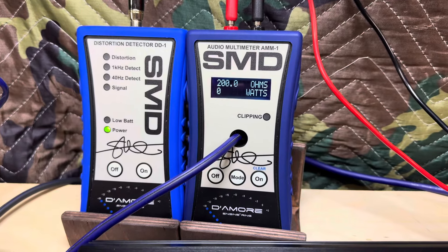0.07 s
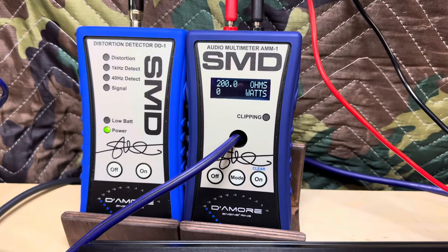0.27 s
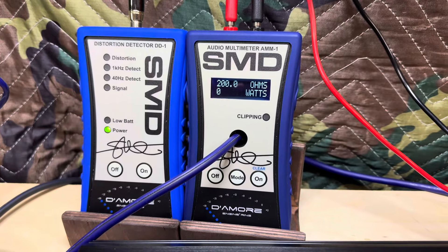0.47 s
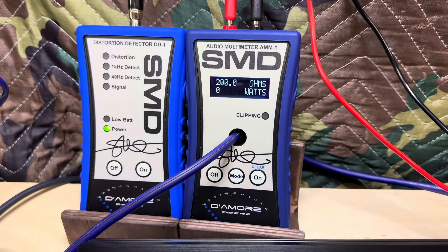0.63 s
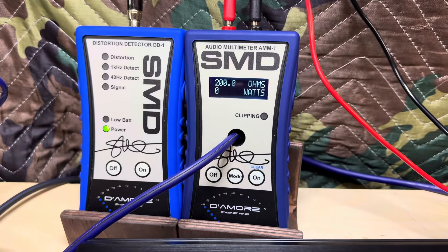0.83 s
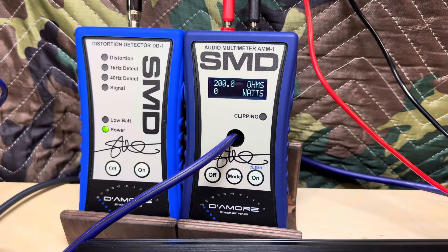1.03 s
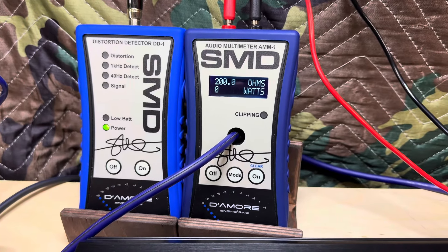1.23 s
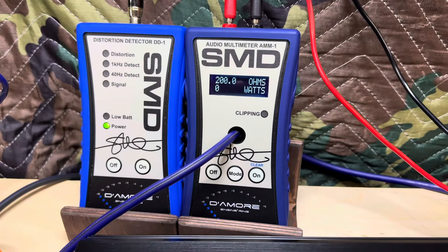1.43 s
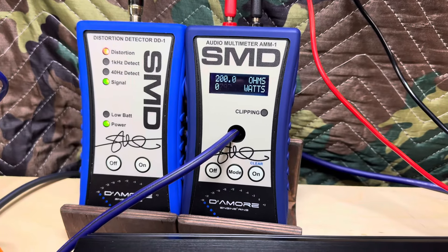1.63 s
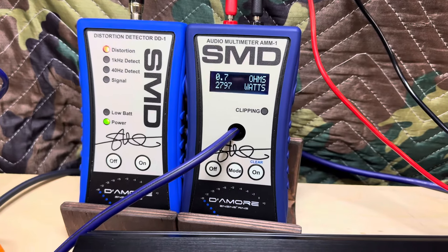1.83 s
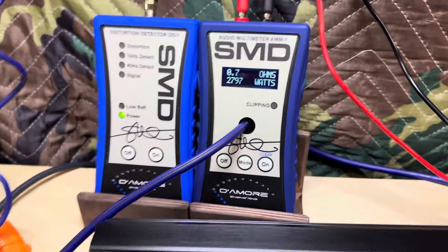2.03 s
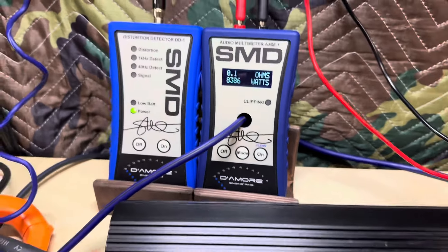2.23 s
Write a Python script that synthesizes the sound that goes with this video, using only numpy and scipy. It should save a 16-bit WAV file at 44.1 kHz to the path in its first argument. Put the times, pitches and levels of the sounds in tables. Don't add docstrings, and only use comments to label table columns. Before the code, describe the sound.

Electronic amplifier blows with a loud arcing pop, thump, sizzle and a quick string of snaps

```python
import sys
import numpy as np
from scipy import signal
from scipy.fft import rfft, irfft, next_fast_len
from scipy.io import wavfile
from scipy.ndimage import map_coordinates

SR = 44100
rng = np.random.default_rng(int(sys.argv[2]) if len(sys.argv) > 2 else 0)


def how_loud(loudness_db):
    steps = np.asarray(loudness_db, float) / 20
    return 10 ** steps


def master_out(mix):
    frames = np.transpose(np.atleast_2d(mix))
    ceiling = np.clip(frames, -1, 1)
    pcm = np.round(ceiling * 32767).astype(np.int16)
    wavfile.write(sys.argv[1], SR, pcm)


N = 101341


def unit(x):
    return x / np.sqrt(np.mean(x ** 2) + 1e-20)


def along(points, hz):
    f, v = np.transpose(points)
    return np.interp(np.log(hz + 1), np.log(f + 1), v)


def curves(rows):
    s, *cols = np.transpose(rows)
    return [np.interp(np.arange(N) / SR, s, c, left=-140) for c in cols]


def wobble(rate):
    knots = rng.standard_normal(int(N * rate / SR) + 4)
    return map_coordinates(knots, [np.arange(N) * rate / SR])


def filtered(x, response):
    m = next_fast_len(x.shape[-1] + 8192)
    spectrum = rfft(x, m) * response(np.fft.rfftfreq(m, 1 / SR))
    return irfft(spectrum, m)[..., :x.shape[-1]]


def ringing(peaks):
    def response(f):
        total = 0
        for k, (c, w, db) in enumerate(peaks):
            total = total + (-1) ** k * how_loud(db) * 1j * f * w / (c * c - f * f + 1j * f * w)
        return total
    return response


# frequency in Hz, likeness from -1 to 1.
ALIKE = [(60, 1), (240, 0.85), (950, 0.16), (3770, -0.16), (15000, 0.33)]


def spread(pair, response, alike=ALIKE):
    def mid_side(hz):
        turn = np.arccos(np.clip(along(alike, hz), -1, 1)) / 2
        return response(hz) * [np.cos(turn), np.sin(turn)]
    mid, side = filtered(pair, mid_side)
    return unit(np.array([mid + side, mid - side]))


def rush(spectrum, lumpy_db, rate):
    noise = rng.standard_normal((2, N)) * how_loud(lumpy_db * wobble(rate))
    return spread(noise, lambda hz: how_loud(along(spectrum, hz)))


def add(track, s, x):
    part = track[..., round(s * SR):][..., :x.shape[-1]]
    part += x[..., :part.shape[-1]]


# time in seconds, rumble in dB, cloth rustle in dB.
AIR = [(0.0, -69, -67), (0.142, -65.5, -78), (0.358, -65.5, -71), (0.402, -61.5, -77.5),
       (0.558, -61.5, -67.5), (0.59, -55, -75), (0.606, -64, -63.5), (0.666, -52, -61.5),
       (0.842, -67.5, -87.5), (0.86, -62, -72.5), (0.97, -64.5, -78.5), (1.032, -66.5, -76.5),
       (1.07, -63, -75), (1.126, -65.5, -78.5), (1.21, -67, -78), (1.4, -61.5, -73.5), (1.624, -60, -74.5),
       (1.7, -51, -81)]
# frequency in Hz, density in dB per Hz.
RUMBLE = [(12, -47), (20, -31), (61, -0.5), (156, -13), (287, -23), (448, -24.5), (586, -28), (700, -37),
          (910, -31), (1540, -120)]
RUSTLE = [(180, 1), (300, -6.5), (366, -13), (523, -9), (735, -8.5), (2680, -18), (9000, -37.5),
          (13000, -41), (19800, -120)]
HISS = [(1200, -3), (2000, 0), (4200, -2.5), (7500, -4.5), (11000, -8.5), (15500, -5.5), (16700, -14),
        (17500, -60)]


def room():
    rumble_db, rustle_db = [np.where(c < -130, c.max(), c) for c in curves(AIR)]
    rumble = how_loud(rumble_db) * rush(RUMBLE, 3.94, 14.6)
    rustle = how_loud(rustle_db) * rush(RUSTLE, 1.2, 60.4)
    return rumble + rustle + how_loud(-85.5) * rush(HISS, 0.81, 7.5)


# start in seconds, level in dB.
CHIRPS = [
    (0.341, -67),
    (1.146, -63.5),
]


def bird():
    low_hz, high_hz, length_s, echo_t60 = 4600, 8100, .015, 0.16
    out, t = np.zeros((2, N)), np.arange(round(length_s * SR)) / SR
    u, late = t / length_s, np.arange(SR // 8) / SR
    hz = low_hz + (high_hz - low_hz) * u ** 0.91
    call = np.sin(np.pi * u) * np.sin(2 * np.pi * np.cumsum(hz) / SR)
    for s, db in CHIRPS:
        echo = 0.084 * rng.standard_normal((2, len(late))) * how_loud(-60 * late / echo_t60)
        echo[:, 0] = 0.45
        add(out, s, how_loud(db) * signal.fftconvolve(call[None], echo, axes=1))
    return out


TICK_S = [.003, .012, .03, .083, .545, .864]
# level in dB, ring in Hz, width in Hz, t60 in seconds.
TICKS = [
    (-59.5, 4700, 2100, 0.027),
    (-67, 11000, 3300, .012),
    (-70.5, 4300, 14000, 0.0078),
    (-55.5, 5300, 840, 0.012),
    (-57, 1220, 120, 0.016),
    (-67.5, 1160, 91, 0.0051),
]
# frequency in Hz, width in Hz, level in dB.
TICK_BODY = [(1940, 460, -9), (4700, 1500, -25)]


def ticks():
    crack_db = -36.5
    out, t = np.zeros((2, N)), np.arange(SR // 10) / SR
    shell = ringing(TICK_BODY)
    for s, (db, hz, width, t60) in zip(TICK_S, TICKS):
        pair = rng.standard_normal((2, len(t))) * how_loud(-60 * t / t60)
        ring = ringing([(hz, width, 0)])

        def response(f):
            return ring(f) + np.sqrt(width / 1500) * shell(f) + how_loud(crack_db) * (f > 400)
        add(out, s, how_loud(db - 9) * spread(pair, response))
    return out


# start in seconds, peak in dB, first Hz, last Hz, length in
# seconds.
THUMPS = [
    (1.719, -21.5, 288, 46.3, 0.028),
    (1.837, -9.5, 370, 36, 0.027),
    (1.915, -28.5, 200, 135, 0.035),
    (2.04, -28.5, 142, 59.5, 0.054),
    (2.176, -22.5, 218, 131.8, 0.036),
    (2.245, -22.5, 240, 124, 0.013),
    (2.092, -23.5, 155, 81.5, 0.017),
]


def thumps():
    fall_s, rise_s = .009, .0012
    out, t = np.zeros(N), np.arange(SR // 8) / SR
    for s, db, first_hz, last_hz, length in THUMPS:
        hz = last_hz + (first_hz - last_hz) * np.exp(-t / fall_s)
        shape = (1 - np.exp(-t / rise_s)) * np.exp(-(t / (0.92 * length)) ** 3)
        add(out, s, how_loud(db) * shape * np.sin(2 * np.pi * np.cumsum(hz) / SR))
    return out


def swells(rows, skew):
    out = np.zeros(N)
    for start, end, hz, db in rows:
        t = np.arange(round((end - start) * SR)) / SR
        shape = np.sin(np.pi * (t / t[-1]) ** skew)
        add(out, start, how_loud(db) * shape * np.sin(2 * np.pi * hz * t))
    return out


# start in seconds, end in seconds, pitch in Hz, peak in dB.
RINGS = [(1.71, 1.743, 1812, -24.5), (1.718, 1.728, 958, -14), (1.713, 1.72, 1236, -15),
         (1.718, 1.731, 334, -12.5), (1.792, 1.817, 392.5, -24.5), (1.828, 1.855, 1800, -34),
         (1.901, 1.946, 389.6, -35.5), (1.96, 1.995, 380.5, -39.5), (2.044, 2.083, 364, -32),
         (2.076, 2.11, 380.7, -18), (2.11, 2.118, 1291, -17), (2.113, 2.127, 397, -22.5),
         (2.139, 2.155, 415, -25), (2.17, 2.192, 413, -16), (2.191, 2.221, 382, -15),
         (2.18, 2.208, 1530, -24), (2.243, 2.252, 3660, -22), (2.241, 2.256, 10800, -24.5),
         (2.242, 2.258, 425.5, -15), (2.265, 2.29, 1150, -39), (2.291, 2.316, 365, -25.5)]


def rings():
    return swells(RINGS, 0.93)


# start in seconds, end in seconds, pitch in Hz, peak in dB.
WHINE = [
    (1.64, 1.71, 174, -45),
    (1.635, 1.68, 240, -53),
    (1.701, 1.716, 1814, -22.5),
]


def whine():
    return swells(WHINE, 2.7)


# time in seconds, flame in dB, jet in dB.
SIZZLE = [(1.628, -78, -73), (1.636, -89, -58.5), (1.7, -71.5, -55), (1.73, -53, -89), (1.765, -58, -59),
          (1.87, -60, -56), (1.96, -55.5, -48.5), (2.01, -50.5, -42), (2.055, -49.5, -42.5),
          (2.098, -50, -45.5), (2.104, -60, -73), (2.13, -46, -47), (2.166, -54.5, -49), (2.2, -50, -43),
          (2.235, -46, -41), (2.265, -46.5, -52), (2.298, -52, -37)]
# frequency in Hz, density in dB per Hz.
FLAME = [(350, -34), (600, -11.5), (1230, -5), (1740, -5.5), (3550, -14), (4310, -17.5), (7680, -14.5),
         (9000, -39), (11700, -68), (19800, -120)]
JET = [(5290, -53), (9000, 8.5), (10200, -1), (13600, 5), (15400, 4), (16300, -25), (16600, -69)]
# time in seconds, shake in dB.
SHAKE = [(1.63, -86), (1.698, -56.5), (1.735, -29), (1.765, -37.5), (1.788, -38.5), (1.8, -40.5),
         (1.826, -26.5), (1.876, -35.5), (1.92, -32), (2.0, -36.5), (2.06, -29), (2.092, -27),
         (2.13, -28.5), (2.158, -30.5), (2.195, -21), (2.212, -27.5), (2.275, -38), (2.298, -27)]
# frequency in Hz, width in Hz, level in dB.
PANEL = [(374.6, 29.4, 0.5), (474, 32.6, -0.5), (302, 245, -9), (127, 104.5, -2), (589, 92, -7),
         (1100, 417, -11.5)]
# frequency in Hz, left-right likeness.
SNAP_ALIKE = [(100, 1), (500, 0.87), (1500, 0.65), (4000, 0.067), (10000, 0.82)]


def arc():
    flame_db, jet_db = curves(SIZZLE)
    shake_db, = curves(SHAKE)
    shaking = rng.standard_normal((2, N)) * how_loud(2.1 * wobble(150))
    tremble = spread(shaking, ringing(PANEL), SNAP_ALIKE)
    flame = how_loud(flame_db + 10.0) * rush(FLAME, 2.75, 120)
    return flame + how_loud(jet_db) * rush(JET, 1.7, 53) + how_loud(shake_db) * tremble


# start in seconds, burst length in seconds, spark in dB, case knock in dB,
# brightness in dB per octave.
SNAPS = [(1.6362, 0.021, -63, -73, -8.5), (1.7134, 0.013, -21, -10, -4), (1.718, 0.0035, -15.5, -10, -3.5),
         (1.7905, 0.0068, -58, -37.5, 1), (1.8367, 0.0071, -44, -23, -15.5), (1.919, 0.009, -56, -29.5, -1),
         (1.9674, 0.028, -46, -40, -8.5), (2.1114, 0.012, -25.5, -15.5, -4.5),
         (2.175, 0.0089, -23, -18, -10.5), (2.1841, 0.0152, -46, -21.5, -13),
         (2.226, 0.0064, -36.5, -29.5, -9.5), (2.2426, 0.012, -23, -19, -6.5),
         (1.7998, 0.0051, -54, -28, -4)]
# frequency in Hz, density in dB per Hz.
SPARK = [(900, -84), (2100, -5), (3650, -0.5), (5100, -5.5), (7300, 2), (11000, 6.5), (15300, 16.5),
         (16900, -27)]
# frequency in Hz, width in Hz, level in dB.
CASE = [(358, 70, 10), (470, 220, -9), (607, 270, -2), (926, 156, 4.5), (1095, 150, 5), (1420, 144, 3.5),
        (1810, 27, 6), (2830, 2000, -20)]
POP_PARTS = [(334, 101, 1.5), (554, 214, -0.5), (910, 148, -1), (1270, 287, -5), (1800, 115, -6.5),
             (2400, 56, -16), (3240, 270, -33), (6100, 64, -45), (7700, 94, -40), (10800, 650, -18.5),
             (11200, 140, -41), (12000, 110, -47)]
SECOND_PARTS = [(365, 65, -1.5), (1150, 92, -1.5), (1440, 220, -5.5), (2320, 90, -8.5), (2710, 100, -18),
                (4642, 50, -10), (5870, 74, -38), (6900, 220, -16.5), (7700, 120, -21), (10000, 440, -16),
                (11800, 130, -42), (12500, 290, -19)]
THIRD_PARTS = [(382, 30, 1.5), (652, 38, -1.5), (1104, 45, -5), (1530, 46, -8.5), (3300, 110, -22),
               (3660, 13, -21), (4250, 40, -34), (6040, 32, -28), (6540, 37, -29), (7360, 38, -18.5)]
LAST_PARTS = [(442, 51, 5.5), (1160, 280, -6), (2300, 73, -7.5), (2630, 58, -8.5), (3660, 76, -7),
              (4300, 86, -30), (6170, 150, -13.5), (7250, 220, -10), (8900, 120, -37), (10050, 200, -15),
              (10800, 120, -16), (12200, 390, -23)]
STRUCK = {1: POP_PARTS, 2: POP_PARTS, 7: SECOND_PARTS, 8: THIRD_PARTS, 9: THIRD_PARTS, 11: LAST_PARTS}


def spark_hail(count):
    sparks_per_s, scatter_db = 6000, 2
    draw, noise = rng.random((2, 2, count)), rng.standard_normal((2, count))
    strength = how_loud(-scatter_db * np.log(draw[1] + 1e-9))
    return (draw[0] < sparks_per_s / SR) * strength * np.sign(noise) + .4 * noise


def snaps():
    crack_fall_db, knock_fall_db = 11, 7
    tail_s, tail_db, tail_top_hz = .12, -22, 1800
    out, t = np.zeros((2, N)), np.arange(SR // 8) / SR
    for k, (s, length, spark_db, knock_db, tilt_db) in enumerate(SNAPS):
        hold = 1 / (1 + np.exp(np.clip((t - length) / .0005, -50, 50)))
        hail = spark_hail(len(t))
        tail = filtered(hail * how_loud(tail_db - 60 * t / tail_s), lambda hz: 1 / (1 + 1j * hz / tail_top_hz) ** 2)
        blows = hail * hold * how_loud(-knock_fall_db * t / length) + tail
        parts = STRUCK.get(k, CASE)
        case = [(hz, w, db + vary) for (hz, w, db), vary in zip(parts, rng.normal(0, 1.5, 14))]

        def colour(hz):
            return how_loud(along(SPARK, hz) + tilt_db * np.log2((hz + 1) / 6000))
        crack = spread(hail * hold * how_loud(-crack_fall_db * t / length), colour, SNAP_ALIKE)
        knock = spread(blows, ringing(case), SNAP_ALIKE)
        add(out, s, np.sqrt(length / t[-1]) * (how_loud(spark_db) * crack + how_loud(knock_db) * knock))
    return out


# centre in Hz, half width in Hz, depth in dB.
NOTCHES = [(5250, 250, -7), (9000, 600, -45), (13500, 750, -45), (19500, 3450, -45)]


def dead_bands(x, share):
    def response(hz):
        return how_loud(share * sum(db * np.exp(-((hz - c) / w) ** 8) for c, w, db in NOTCHES))
    return filtered(x, response)


# frequency in Hz, left over right in dB.
AMP_LEAN = [(60, -0.5), (350, -3), (700, -4.5), (1500, 0), (5000, 0), (12000, 0)]


def scene():
    loud_share = 0.2
    lag_s = .00002
    side = np.array([[.5], [-.5]])
    blasts = dead_bands(snaps() + thumps() + whine() + rings(), loud_share)
    failure = blasts + dead_bands(arc(), 0.85)

    def place(hz):
        return how_loud(along(AMP_LEAN, hz) * side) * np.exp(-2j * np.pi * hz * lag_s * side)
    placed = filtered(failure, place)
    return placed + dead_bands(room(), 0.71) + dead_bands(ticks(), loud_share) + bird()


def top_cut(x):
    return signal.sosfilt(signal.butter(12, 16820, fs=SR, output="sos"), x)


def record(dry):
    ceiling = .95
    mix = dry / (1 + np.abs(dry / ceiling) ** 6) ** (1 / 6)
    return top_cut(mix)


dry = scene()
out = record(dry)
master_out(out)
```